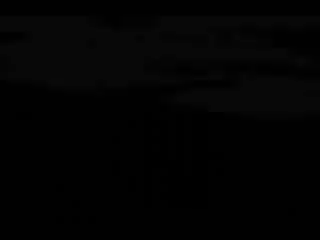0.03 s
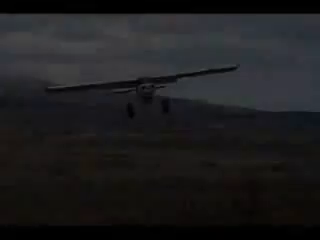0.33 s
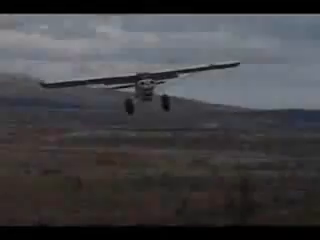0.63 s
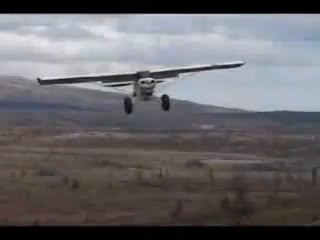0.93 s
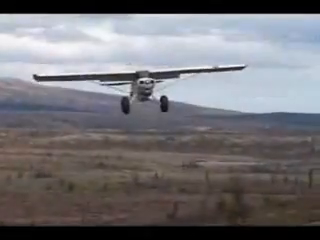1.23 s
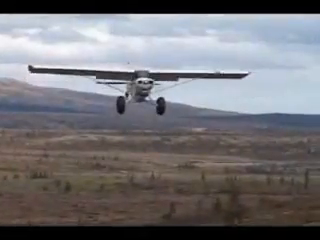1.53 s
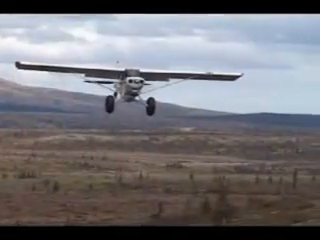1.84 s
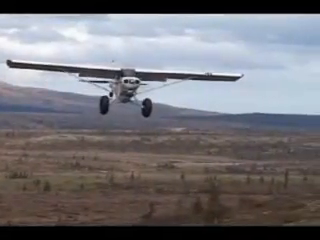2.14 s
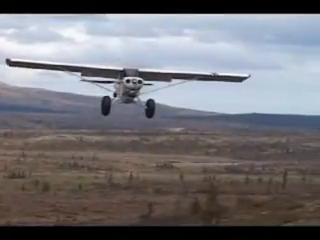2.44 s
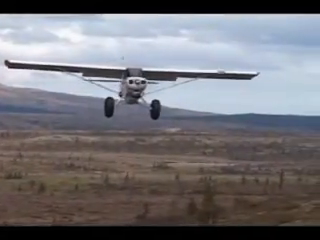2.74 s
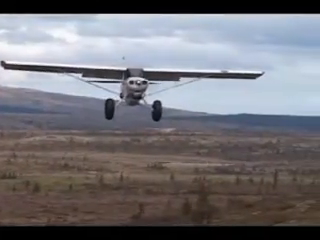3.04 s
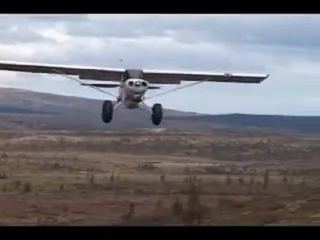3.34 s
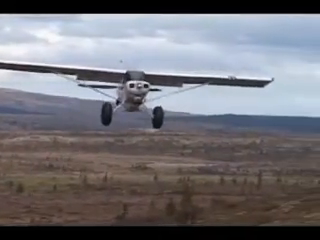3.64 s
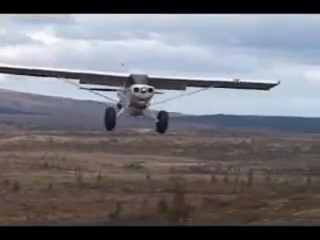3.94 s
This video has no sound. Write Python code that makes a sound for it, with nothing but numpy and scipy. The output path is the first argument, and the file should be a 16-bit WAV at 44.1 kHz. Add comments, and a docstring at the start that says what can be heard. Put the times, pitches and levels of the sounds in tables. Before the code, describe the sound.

A light propeller plane approaches with its engine slowing, as gusts rumble on the microphone.

```python
"""A small propeller plane glides in low over open land, throttling back.
First its four-cylinder exhaust stands out, one noise puff per firing; later the swish of the slowing
propeller, one swell per blade pass; then a bright hiss of air. Wind eddies buffet the microphone with
rumble, flutter and a few hard slaps. The sound cuts in after a moment of silence and swells."""
import sys
import numpy as np
from scipy import signal
from scipy.fft import rfft, irfft, next_fast_len
from scipy.io import wavfile
from scipy.ndimage import uniform_filter1d, map_coordinates

SR = 44100
rng = np.random.default_rng(int(sys.argv[2]) if len(sys.argv) > 2 else 0)


def dump_mix(stems):
    """Bounce the given channels to the path in sys.argv[1] as a 16-bit WAV at rate SR."""
    frames = np.atleast_2d(stems).T  # one column per channel
    limited = np.clip(frames, -1, 1)  # hard clip at full scale
    pcm = np.round(limited * 32767).astype(np.int16)
    wavfile.write(sys.argv[1], SR, pcm)


N = 176400
T = np.arange(N) / SR


def amp(db):
    """Decibels to gain."""
    return 10 ** (np.asarray(db) / 20)


def unit(x):
    """Scale to rms 1."""
    return x / np.sqrt(np.mean(x ** 2) + 1e-20)


def curve(rows, column=1):
    """One table column, interpolated per sample; column 0 is time in seconds."""
    columns = np.transpose(rows)
    return np.interp(T, columns[0], columns[column])


def wobble(rate_hz):
    """Smooth random curve, rate_hz knots a second."""
    return map_coordinates(rng.standard_normal(2048), [T * rate_hz], mode="wrap")


def filtered(x, response):
    """Apply a gain given as a function of frequency in Hz."""
    size = next_fast_len(N + SR // 2)
    return irfft(rfft(x, size) * response(np.fft.rfftfreq(size, 1 / SR)), size)[:N]


def noise(spectrum, patchy_db):
    """Coloured noise of rms 1 with random gain patches in time and frequency."""
    bins = signal.stft(rng.standard_normal(N), nperseg=512)[2]
    patches = uniform_filter1d(rng.standard_normal(bins.shape), 6, axis=0)
    patches = uniform_filter1d(patches, 14, axis=1)
    patchy = signal.istft(bins * amp(patchy_db * unit(patches)), nperseg=512)[1][:N]
    hz, db = np.transpose(spectrum)
    return unit(filtered(patchy, lambda f: amp(np.interp(np.log(f + 1), np.log(hz + 1), db))))


# Wind envelopes. Each row: time in seconds, level in dB.
RUMBLE_LEVELS = [(0.29, -41), (0.53, -26.5), (0.59, -33.5), (0.71, -21), (0.83, -27), (1.25, -19.5),
                 (1.31, -21), (1.43, -20.5), (1.49, -22.5), (1.73, -18.5), (1.97, -25), (2.0, -15.5),
                 (2.15, -26), (2.24, -20.5), (2.51, -23), (2.57, -20), (2.72, -26), (2.87, -21),
                 (2.93, -23.5), (3.17, -29.5), (3.26, -19.5), (3.32, -25.5), (3.47, -19), (3.99, -21.5)]
FLUTTER_LEVELS = [(0.29, -45.3), (0.59, -32), (0.65, -41), (0.71, -33), (1.16, -28.6), (1.37, -33),
                  (1.43, -23), (1.52, -29.5), (1.61, -24.5), (1.82, -25.5), (2.24, -30), (2.39, -25),
                  (2.48, -34), (2.6, -25), (2.66, -34), (2.72, -22), (2.78, -35), (3.08, -23.5),
                  (3.14, -30.5), (3.26, -24.5), (3.32, -36), (3.38, -25), (3.56, -26), (3.71, -31.8),
                  (3.74, -29.5), (3.89, -30), (3.95, -24.5), (3.99, -36)]
# Wind spectra. Each row: frequency in Hz, gain in dB.
RUMBLE_SPECTRUM = [(12, -28), (24, -1), (32, -3.5), (45, -2), (62, 2), (85, 0), (120, -0.5), (160, -7),
                   (230, -23.5), (400, -67.5)]
FLUTTER_SPECTRUM = [(80, -37), (130, -5.5), (180, 1.5), (250, -2), (330, -5.5), (420, -10.5), (600, -18.5),
                    (900, -26.5), (2000, -37.5), (5000, -43.5), (10000, -72)]


def wind():
    """Eddies hit the microphone: a deep rumble and a rougher flutter above it."""
    eddies_db = wobble(rate_hz=60)
    rumble = unit(amp(eddies_db) * noise(RUMBLE_SPECTRUM, patchy_db=-0.17))
    flutter_db = 1.8 * eddies_db + 2.02 * wobble(rate_hz=160)
    flutter = unit(amp(flutter_db) * noise(FLUTTER_SPECTRUM, patchy_db=0.75))
    return amp(curve(RUMBLE_LEVELS)) * rumble + amp(curve(FLUTTER_LEVELS)) * flutter


# Hardest eddies. Each row: start in seconds, relative peak level in dB.
SLAP_EVENTS = [(0.523, -20), (0.692, -18.5), (0.877, -12.5), (1.056, -10.5), (1.172, -11), (1.434, -8),
               (1.634, -11.5), (1.713, -9.5), (1.752, -10), (2.002, -7.5), (2.297, -12.5), (2.389, -8.5),
               (3.06, -10.5), (3.563, -14)]
# Slap noise spectrum. Each row: frequency in Hz, gain in dB.
SLAP_SPECTRUM = [(100, -10.5), (220, 2.5), (400, -4), (800, -19), (1800, -28.5), (5000, -36.5),
                 (10000, -53.5)]


def wind_slaps(gain_db=-5, median_hz=145.4, rise_s=0.0042, puff_db=-8.5):
    """Each hard eddy gives one short push and pull of pressure with a puff of noise."""
    pressure, envelope = np.zeros(N), np.zeros(N)
    for start_s, peak_db in SLAP_EVENTS:
        age_s = np.maximum(T - start_s, 0)
        rise = age_s / rise_s
        swell = amp(peak_db + gain_db) * rise ** 2 * np.exp(2 * (1 - rise))
        pitch_hz = median_hz * np.exp(0.16 * rng.standard_normal())
        pressure += swell * np.sin(2 * np.pi * pitch_hz * age_s)
        envelope += swell
    return pressure + amp(puff_db) * envelope * noise(SLAP_SPECTRUM, patchy_db=1)


# Airflow envelopes. Each row: time in seconds, relative level in dB.
RUSH_LEVELS = [(0.29, -56.5), (0.8, -47.6), (1.16, -47), (1.22, -49), (1.46, -44.5), (1.55, -49),
               (2.24, -40), (2.33, -44.0), (2.51, -38.5), (3.47, -47), (3.59, -40), (3.62, -47),
               (3.83, -44), (3.99, -42)]
ROAR_LEVELS = [(.27, -65), (1.8, -56), (1.98, -48.5), (2.08, -60.5), (2.55, -46.5), (2.72, -45.5),
               (2.9, -40.5), (3.08, -51), (3.3, -49.5), (3.7, -57), (4, -47)]
HISS_LEVELS = [(0.29, -73), (0.47, -78), (0.68, -60), (1.28, -64), (1.58, -63.5), (1.73, -58.7),
               (2.09, -56), (2.27, -55), (2.42, -54), (2.54, -48.5), (2.63, -60), (2.96, -45.5),
               (3.11, -53.5), (3.38, -55), (3.53, -45), (3.65, -50.5), (3.86, -41.5), (3.99, -45.5)]
# Airflow spectra. Each row: frequency in Hz, gain in dB.
RUSH_SPECTRUM = [(300, -1), (600, 5.5), (850, 2.5), (1080, 5), (1220, 0), (1360, 4), (1550, -7), (1850, -7),
                 (2200, -8), (2700, -10), (3200, -9.5), (4600, -12.5), (5800, -17), (8000, -22),
                 (10500, -55.5)]
ROAR_SPECTRUM = [(700, -13), (1300, 0.5), (1750, 2.5), (2200, -4.5), (2650, -5.5), (3300, -19.5),
                 (5000, -17.5), (9000, -26)]
HISS_SPECTRUM = [(1500, -4), (3000, 2), (4500, 1.5), (5800, 0), (7000, 1.5), (8200, 4.5), (9200, 0.5),
                 (10000, -1.5), (10800, -24)]


def airflow(rush_gain_db=2, hiss_gain_db=1):
    """Air around the plane: broad rush, midrange roar and bright hiss, flickering in turbulence."""
    flicker = wobble(rate_hz=60)
    rush_db = curve(RUSH_LEVELS) + rush_gain_db + 1.7 * flicker + 0.48 * wobble(rate_hz=250)
    rush = amp(rush_db) * noise(RUSH_SPECTRUM, patchy_db=2)
    roar_db = curve(ROAR_LEVELS) + 1.4 * flicker
    roar = amp(roar_db) * noise(ROAR_SPECTRUM, patchy_db=2)
    hiss_db = curve(HISS_LEVELS) + hiss_gain_db + 1.4 * flicker + 1.7 * wobble(rate_hz=290)
    hiss = amp(hiss_db) * noise(HISS_SPECTRUM, patchy_db=1.5)
    return rush + roar + hiss


# Engine slowing. Each row: time in seconds, firing rate in Hz.
FIRING_RATES = [(.27, 74.8), (.5, 74.3), (.7, 73.2), (.86, 71.9), (1.04, 70.5), (1.5, 65), (2, 62.3),
                (2.45, 62.2), (2.75, 60.9), (3.2, 60), (3.8, 57)]


def firing_count(first_firing_s=0.2935):
    """Running count of engine firings, equal to blade passes."""
    count = np.cumsum(curve(FIRING_RATES)) / SR
    return count - np.interp(first_firing_s, T, count)


# Blade noise envelopes. Each row: time in seconds, high swish, mid swish and low rasp levels in dB.
BLADE_LEVELS = [(.27, -69.5, -77, -66), (1.7, -63.5, -61.5, -60.5), (1.98, -50, -53.5, -57),
                (2.1, -56, -55, -60), (2.19, -47.5, -47, -43.5), (2.275, -41, -51.5, -45.5),
                (2.36, -45.5, -43.5, -40), (2.44, -49, -46, -43.5), (2.525, -42.5, -36, -46),
                (2.6, -53, -48.5, -56), (2.68, -48, -53.5, -51.5), (2.85, -55.5, -49, -48),
                (3.15, -60, -58, -62), (4, -59, -61.5, -64)]
# Blade noise spectra. Each row: frequency in Hz, gain in dB.
HIGH_SWISH_SPECTRUM = [(2500, -22), (3900, -7), (4400, 4), (4850, 3), (5200, 3.5), (5800, -8.5),
                       (8300, -10), (10500, -32.5)]
MID_SWISH_SPECTRUM = [(1500, -19), (2900, -5.5), (3450, 0.5), (3900, 1), (4400, -1), (5000, -16),
                      (9000, -23.5), (10500, -29)]
RASP_SPECTRUM = [(600, -19), (1300, -6.5), (2100, -4), (2400, 4), (2720, 4.5), (3100, -1.5), (4000, -35)]


def propeller(depth=0.54, scatter_db=2.05):
    """Blade noise swells once per blade pass; its weight shifts between three bands."""
    passes = 1 + depth * np.cos(2 * np.pi * firing_count())
    passes *= amp(scatter_db * wobble(rate_hz=60))
    high = amp(curve(BLADE_LEVELS, column=1)) * noise(HIGH_SWISH_SPECTRUM, patchy_db=1.5)
    mid = amp(curve(BLADE_LEVELS, column=2)) * noise(MID_SWISH_SPECTRUM, patchy_db=1.5)
    rasp = amp(curve(BLADE_LEVELS, column=3)) * noise(RASP_SPECTRUM, patchy_db=1.5)
    return unit(passes) * (high + mid + rasp)


# Exhaust envelopes. Each row: time in seconds, crackle level in dB, lower bark level in dB.
EXHAUST_LEVELS = [(.27, -55, -64), (.4, -52, -61.5), (.58, -52, -54), (.68, -48.5, -47.5),
                  (.82, -45, -43.5), (.95, -46.5, -49.5), (1.12, -56, -58), (1.6, -63.5, -61),
                  (4, -58.5, -65)]
# Exhaust spectra. Each row: frequency in Hz, gain in dB.
CRACKLE_SPECTRUM = [(900, -13), (1800, -1.5), (2200, -2.5), (2550, 1.5), (3000, 0), (3500, -4), (4400, -2),
                    (5300, -5), (6500, -12), (8500, -21.5), (10500, -36.5)]
BARK_SPECTRUM = [(600, -21), (1200, -11.5), (1450, 6.5), (1630, 2), (1800, 5), (2200, -15.5), (3000, -43)]
# Steady noise between puffs. Each row: time in seconds, level in dB relative to the puffs.
BLUR_LEVELS = [(.27, -16), (.6, -8.5), (.84, -4.5), (.92, 2.5), (1, 6.5), (4, 7)]
# Firing cycle. Each entry: relative level of one cylinder in dB.
CYLINDER_LEVELS = [3.5, 0, 2.5, 2]


def exhaust(attack_s=0.0012, decay_s=0.0043, scatter_db=1.5):
    """Four unequal cylinders each let out a sharp puff per firing; the puffs blur into steady noise."""
    count = firing_count()
    firing = np.floor(count).astype(int)
    age_s = (count - firing) / curve(FIRING_RATES)
    puff_db = np.take(CYLINDER_LEVELS, firing, mode="wrap")
    puff_db += scatter_db * rng.standard_normal(512)[firing]
    puffs = amp(puff_db) * (1 - np.exp(-age_s / attack_s)) * np.exp(-age_s / decay_s)
    crackle = amp(curve(EXHAUST_LEVELS, column=1)) * noise(CRACKLE_SPECTRUM, patchy_db=1.5)
    bark = amp(curve(EXHAUST_LEVELS, column=2)) * noise(BARK_SPECTRUM, patchy_db=1.5)
    blur = amp(curve(BLUR_LEVELS))
    envelope = np.sqrt((unit(puffs) ** 2 + blur ** 2) / (1 + blur ** 2))  # equal-power blend
    return envelope * (crackle + bark)


def scene():
    """The plane behind the wind, in mono."""
    return (exhaust() + propeller() + airflow() + wind() + wind_slaps())[None]


def record(dry, ceiling=0.37, start_s=0.2676, fade_s=0.014, cutoff_hz=10700):
    """Soft clip, quick fade-in after silence, brick-wall low-pass."""
    rounded = dry[0] / (1 + (dry[0] / ceiling) ** 4) ** (1 / 4)
    fade_in = np.clip((T - start_s) / fade_s, 0, 1)
    return filtered(rounded * fade_in, lambda hz: hz < cutoff_hz)[None]


dry = scene()
out = record(dry)
dump_mix(out)
```